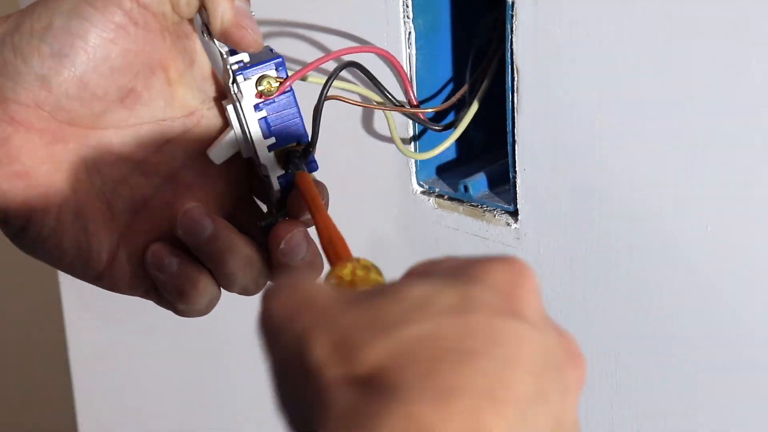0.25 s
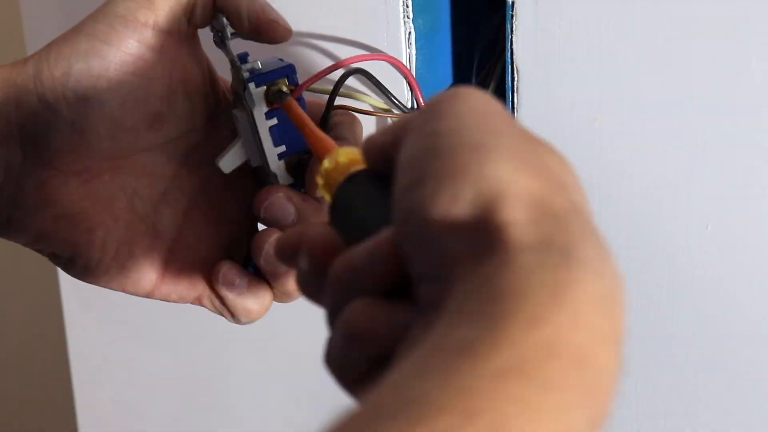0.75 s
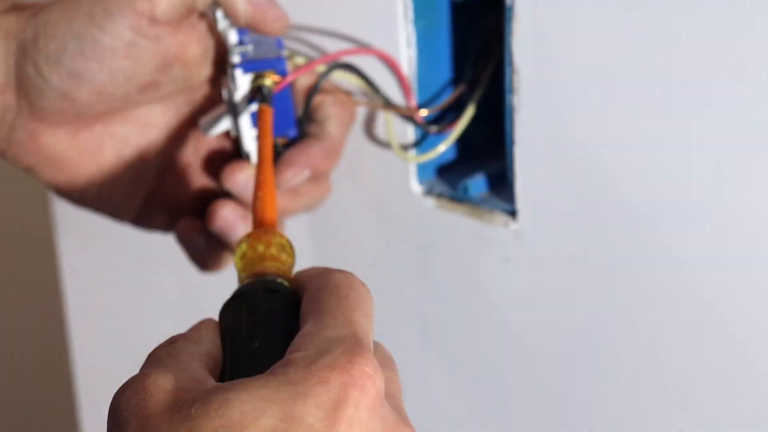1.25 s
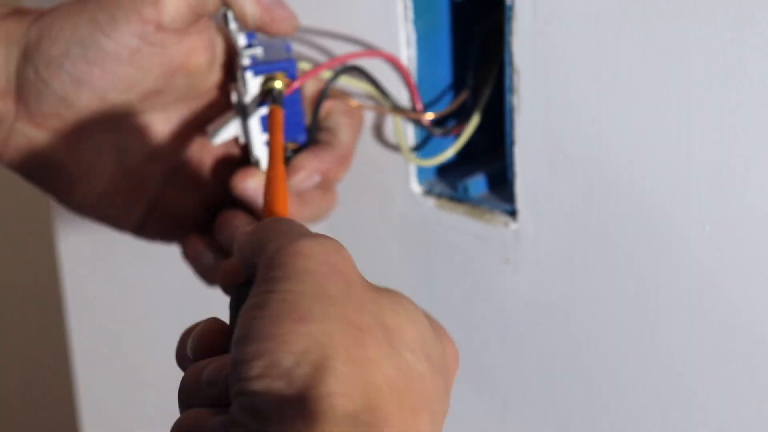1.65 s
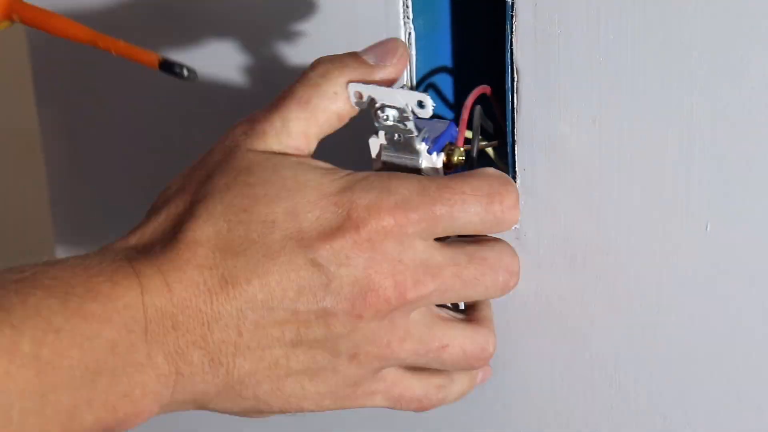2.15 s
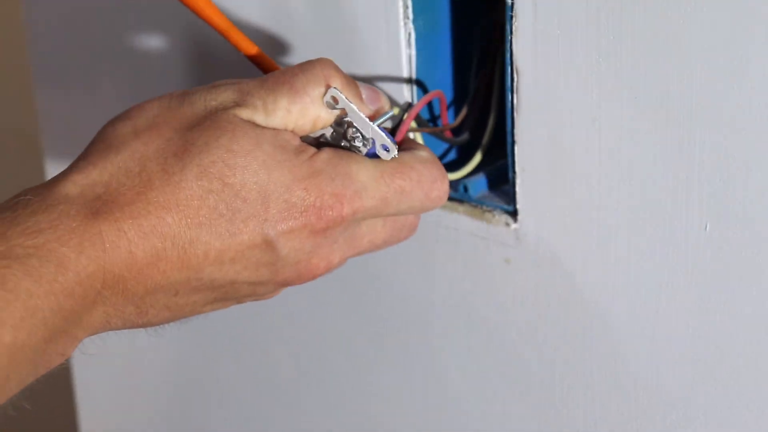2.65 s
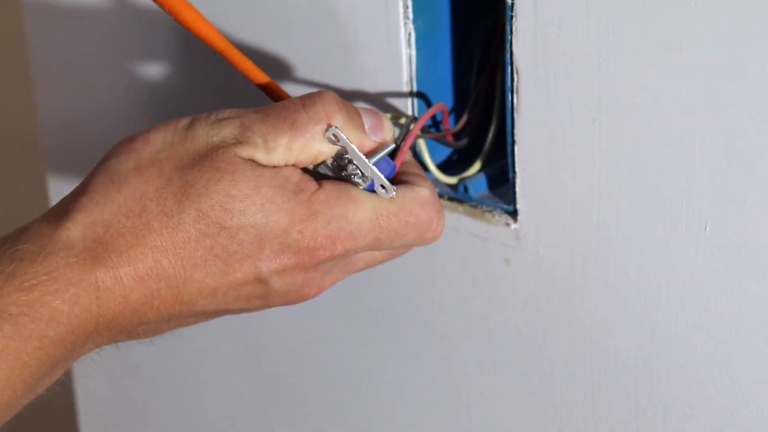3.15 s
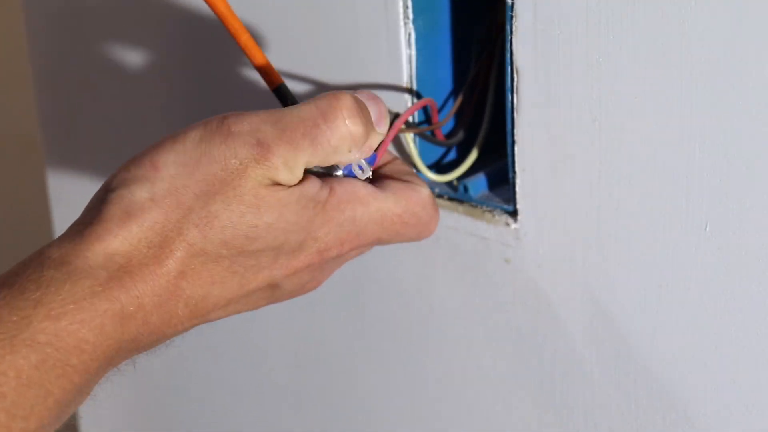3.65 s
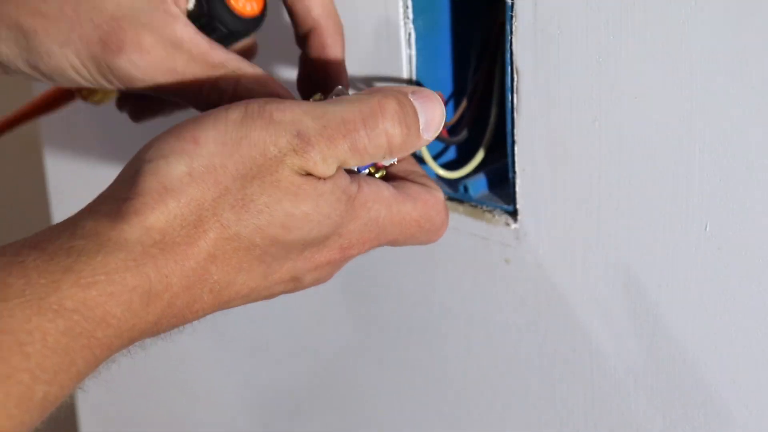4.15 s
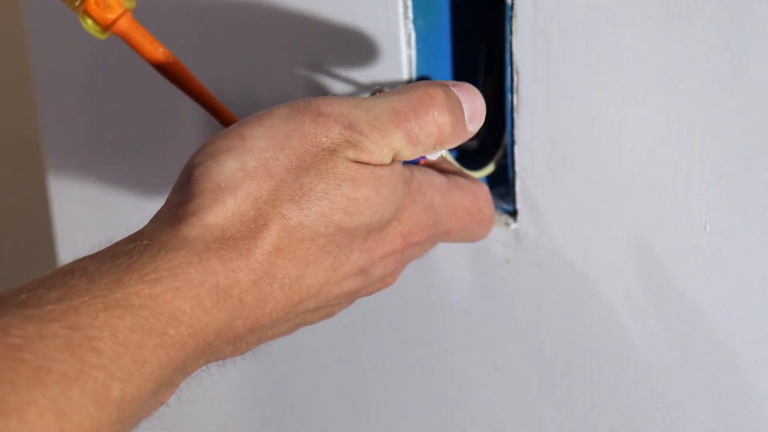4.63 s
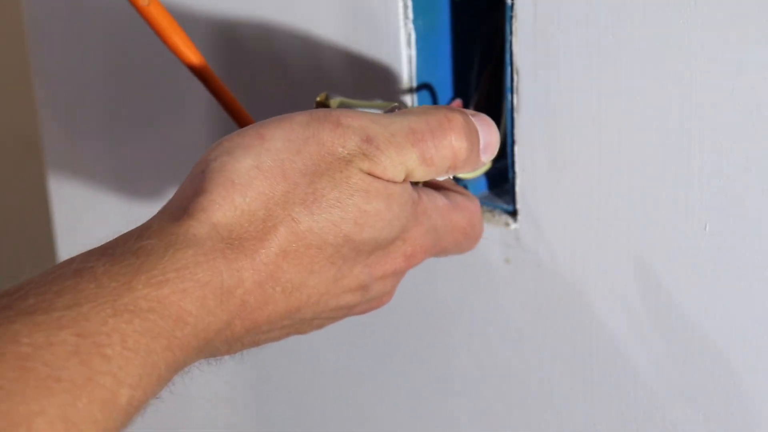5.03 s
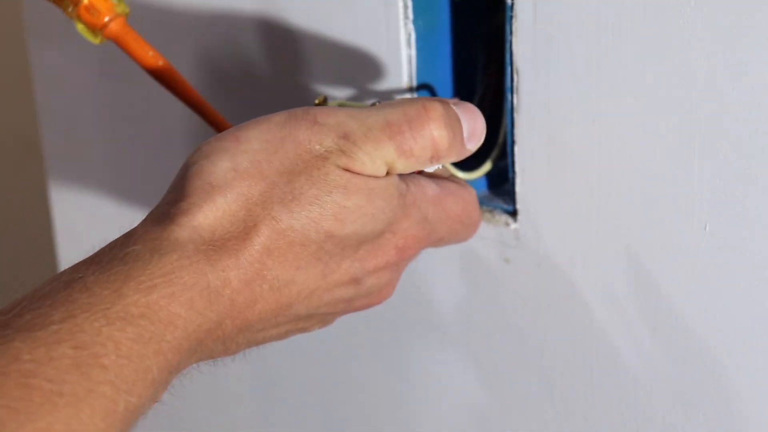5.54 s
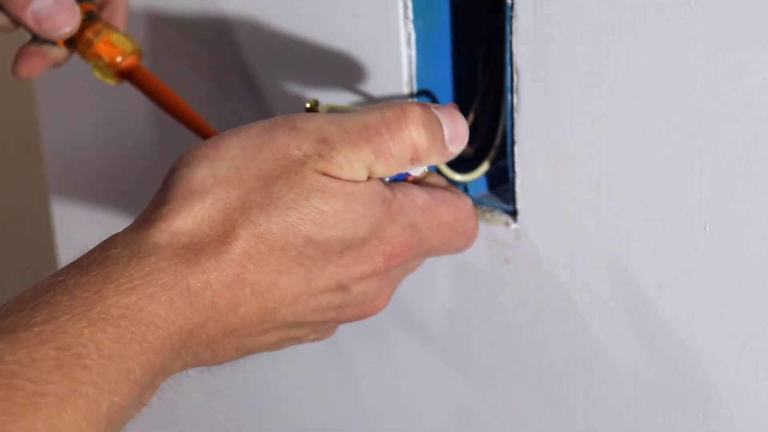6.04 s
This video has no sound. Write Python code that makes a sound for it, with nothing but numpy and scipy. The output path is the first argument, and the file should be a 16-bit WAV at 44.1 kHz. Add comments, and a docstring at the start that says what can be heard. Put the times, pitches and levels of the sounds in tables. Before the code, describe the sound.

A screwdriver turns terminal screws on a plastic switch held in the hand, very close in a quiet, small-sounding room. Dense sharp ticks, gritty scrapes and tiny squeaks come first. Just before two seconds the switch is turned over with a soft rustle and thuds, then the turning continues quieter and sparser, with regular breathy finger brushes on the handle. Steady faint hiss and a thin whine lie beneath.

```python
"""In a quiet room, close by, a screwdriver backs the terminal screws out of a wall switch held in one hand.
The tip slips, ticks and squeaks in the screw heads (struck modes, wavering tones); threads grind (filtered grains).
About three times a second the fingers brush round the handle (swelling noise); harder knocks ring a low note.
Just before two seconds the switch turns over into the fist: the resonances change, a soft rustle and thuds follow.
Short echoes, steady room hiss and a faint whine complete it; both channels are the same."""
import sys
import numpy as np
from scipy import signal
from scipy.fft import rfft, irfft
from scipy.io import wavfile
from scipy.ndimage import map_coordinates

SR = 44100
rng = np.random.default_rng(int(sys.argv[2]) if len(sys.argv) > 2 else 0)


def master(y):
    """Save y as 16-bit WAV."""
    cut = np.clip(np.atleast_2d(y).T, -1, 1)
    pcm = np.round(cut * 32767)  # scale
    wavfile.write(sys.argv[1], SR, pcm.astype(np.int16))


N = 277389
TIME = np.arange(N) / SR


def from_db(db):
    """Decibels to gain."""
    return 10 ** (np.asarray(db) / 20)


def rms_one(x):
    """Scale to unit rms."""
    return x / np.sqrt(np.mean(x ** 2) + 1e-20)


def add(track, start_s, sound):
    """Mix a sound into the track at start_s."""
    start = int(np.clip(start_s * SR, 0, N - 1))
    track[start:start + len(sound)] += sound[:N - start]


def wander(t, points_per_s, points):
    """Random curve: normal draws joined by straight lines."""
    return np.interp(t * points_per_s, np.arange(points), rng.standard_normal(points))


def colour(x, spectrum, shift=1):
    """Causal minimum-phase filter with the given response, moved in pitch by shift; rms 1."""
    size = 4096
    hz, response_db = np.transpose(spectrum)
    bin_hz = np.arange(size // 2 + 1) * SR / size
    octaves = np.log2(np.maximum(bin_hz, 1))
    knots = np.log2(hz * shift)
    # 12 dB/octave skirt below the lowest knot, at most 36 dB
    skirt_db = 12 * np.clip(knots[0] - octaves, 0, 3)
    log_gain = np.log(from_db(np.interp(octaves, knots, response_db) - skirt_db))
    # folding the cepstrum onto positive time gives minimum phase
    cepstrum = irfft(log_gain)
    cepstrum[1:size // 2] *= 2
    cepstrum[size // 2 + 1:] = 0
    impulse = irfft(np.exp(rfft(cepstrum)))
    return rms_one(signal.fftconvolve(x, impulse)[:len(x)])


def grains(per_s, spread_db, smooth_db, low_hz, high_hz, count):
    """Tiny slips of uneven size, each ringing at one of count pitches, over smooth sliding noise."""
    size_db = spread_db * np.minimum(rng.exponential(1, N), 4)
    sizes = from_db(size_db) * rng.choice([-1, 1], N)
    slip_train = sizes * (rng.random(N) < per_s / SR)
    dealt = rng.integers(0, count, N)
    white = rng.standard_normal((2, N))
    rings, smooth = 0, 0
    for k, hz in enumerate(np.geomspace(low_hz, high_hz, count)):
        ringer = signal.iirpeak(hz, 6, fs=SR)
        # the tiny offset avoids denormals
        rings = rings + signal.lfilter(*ringer, slip_train * (dealt == k) + 1e-18)
        smooth = smooth + signal.lfilter(*ringer, white[k % 2]) * (-1) ** (k // 2)
    return rms_one(rings) + from_db(smooth_db) * rms_one(smooth)


def strike(modes, length_s, scatter, uneven_db, favoured_hz=None):
    """One blow on decaying modes, each shifted in pitch and share by the contact point; rms 1 over 2 ms."""
    hz, level_db, t60_s = np.transpose(modes)[:, :, None]
    if favoured_hz:
        level_db = level_db - 36 * np.abs(np.log2(hz / favoured_hz))  # dB per octave away
    t = TIME[:int(length_s * SR)]
    detune, share = rng.standard_normal((2, len(modes), 1))
    signs = (-1) ** np.arange(len(modes))[:, None]
    decay = from_db(level_db + uneven_db * share - 60 * t / t60_s)
    tones = np.sin(2 * np.pi * hz * (1 + scatter * detune) * t)
    ring = (signs * decay * tones).sum(axis=0)
    return ring / np.sqrt(np.mean(ring[:SR // 500] ** 2))


def echoes(length_s, t60_s, delay_s, dull_hz):
    """Diffuse echoes: delayed, decaying noise through a gentle low-pass."""
    t = TIME[:int(length_s * SR)]
    tail = rng.standard_normal(len(t)) * from_db(-60 * t / t60_s) * (t > delay_s)
    low_pass = signal.butter(1, dull_hz, fs=SR, output="sos")
    return signal.sosfilt(low_pass, tail / np.linalg.norm(tail))


# turn-over into the fist: start_s, end_s
TURN_OVER = (1.87, 1.89)


def grip(s, open_and_fist):
    """A value that changes as the switch is turned over from the open hand into the fist."""
    return np.interp(s, TURN_OVER, open_and_fist)


# steady room background: freq_hz, spectrum_db
ROOM_AIR = [(30, -43), (80, -41), (300, -15), (550, 1), (1500, 3), (2700, -2.5), (5200, -17.5), (6400, -8),
            (10500, -26), (16000, -21)]
AIR_DB = -52


def room_air():
    """Steady room hiss: coloured white noise."""
    return from_db(AIR_DB) * colour(rng.standard_normal(N), ROOM_AIR)


WHINE_HZ, WHINE_DB = 3370, -61.5
WHINE_WAVER_HZ, WHINE_WAVERS_PER_S = 14, 40


def whine():
    """A thin background tone: a sine with slightly wandering frequency."""
    pitch_hz = WHINE_HZ + WHINE_WAVER_HZ * wander(TIME, WHINE_WAVERS_PER_S, N // 100)
    return from_db(WHINE_DB) * rms_one(np.sin(2 * np.pi * np.cumsum(pitch_hz) / SR))


# tip resting in the slot between strokes: time_s, grind_db
RESTING_GRIND = [(0, -45), (.55, -39.5), (.7, -46), (.85, -39.5), (1.05, -44.5), (1.4, -38.5), (1.62, -50),
                 (1.87, -50), (1.92, -54), (2.25, -49), (2.65, -46.5), (3.2, -49.5), (4.15, -52),
                 (4.55, -48.5), (5, -51.5), (6.29, -52)]
RESTING_BRIGHT_DB = -2.5
# scrapes as the screw twists or the switch shifts under the tool: start_s, end_s, grind_db, bright_db
TWIST_STROKES = [(0, 0.026, -35, -13), (0.071, 0.191, -34, 4.5), (.225, .29, -40.5, 8),
                 (0.344, 0.4, -37.5, 8), (0.583, 0.628, -33.5, 7), (0.753, .815, -35, 9),
                 (1.083, 1.16, -41.5, 3), (1.517, 1.56, -39.5, 9), (1.734, 1.772, -32.5, 9.5),
                 (1.798, 1.861, -38, 4), (1.866, 1.889, -30, 1.5), (2.047, 2.099, -38.5, 6.5),
                 (2.174, 2.199, -33, -18), (2.202, 2.244, -40, -12), (2.534, 2.585, -40.5, 9),
                 (2.92, 2.998, -43.5, -4), (3.098, 3.172, -44, 5), (3.228, 3.272, -42, -1),
                 (3.458, 3.515, -44, 6), (3.582, 3.63, -44, 10), (3.83, 3.946, -43, 9),
                 (4.185, 4.3, -45.5, -5), (4.465, 4.505, -44.5, 5), (4.602, 4.72, -52, -8),
                 (4.852, 4.948, -41, -10.5), (5.203, 5.24, -41.5, 4), (5.29, 5.33, -45, 5),
                 (5.52, 5.626, -43.5, -4), (5.663, 5.733, -40.5, -4), (5.954, 6.032, -46.5, 8),
                 (6.044, 6.106, -39.5, 0)]
TWIST_ATTACK_S, TWIST_RELEASE_S = 0.0069, 0.017
DRAG_SHAPE = 0.31  # power of a half sine


def grinding():
    """Friction level and brightness in dB: powers of resting contact, twists and dragging regrips add."""
    time_s, resting_db = np.transpose(RESTING_GRIND)
    strokes = [(from_db(np.interp(TIME, time_s, resting_db)), RESTING_BRIGHT_DB)]
    for start_s, end_s, grind_db, bright_db in TWIST_STROKES:
        edge = np.minimum((TIME - start_s) / TWIST_ATTACK_S, (end_s - TIME) / TWIST_RELEASE_S)
        strokes.append((from_db(grind_db) * np.clip(edge + .5, 0, 1), bright_db))
    for start_s, end_s, _, _, grind_db, bright_db in HANDLE_SLIDES:
        along = np.clip((TIME - start_s) / (end_s - start_s), 0, 1)
        swell = np.abs(np.sin(np.pi * along)) ** DRAG_SHAPE
        strokes.append((from_db(grind_db) * swell, bright_db))
    power = sum(gain ** 2 for gain, _ in strokes)
    mean_bright_db = sum(gain ** 2 * bright_db for gain, bright_db in strokes) / power
    return 10 * np.log10(power), mean_bright_db


# friction colours, plastic rub / thread grit / fine hiss: freq_hz, response_db
RUB_COLOUR = [(300, -21.5), (600, -5), (1150, -6.5), (1500, 0), (1850, 1), (2200, -3), (2800, -5),
              (3600, -15), (6000, -54)]
GRIT_COLOUR = [(2500, -20.5), (3100, 1.5), (3550, 0.5), (4900, 2), (5600, 1), (6400, -10), (8200, -3.5),
               (9200, -9), (10800, -19.5), (16000, -48)]
HISS_COLOUR = [(6000, -12), (9000, -7.5), (10800, -5.5), (12700, -2.5), (16000, -10.5)]
# share of the grinding: open_hand_db, fist_db
RUB_DB, GRIT_DB, HISS_DB = (-7.5, -3.5), (-5, -5.5), (-23.5, -15)
RUB_LOSS = 0.24  # dB lost per dB of brightness
CATCHES_PER_S, CLUMP_DB = 140, 2.2


def friction(grind_db, bright_db):
    """Dense micro-slips: dull on the plastic, gritty in the threads, with a fine hiss on top."""
    rub_db = grind_db + grip(TIME, RUB_DB) - RUB_LOSS * bright_db
    grit_db = grind_db + grip(TIME, GRIT_DB)
    hiss_db = grind_db + grip(TIME, HISS_DB) + bright_db
    # threads catch and let go: grit and hiss clump together
    clumps = from_db(CLUMP_DB * wander(TIME, CATCHES_PER_S, N // 100))
    plastic = grains(2500, 3.47, -4, low_hz=455, high_hz=3200, count=14)
    threads = grains(2200, 3.8, -5, low_hz=2900, high_hz=10000, count=12)
    dust = grains(1500, 7, 1, low_hz=7000, high_hz=15500, count=8)
    rub = from_db(rub_db) * colour(plastic, RUB_COLOUR)
    grit = from_db(grit_db) * colour(threads * clumps, GRIT_COLOUR)
    hiss = from_db(hiss_db) * colour(dust * clumps, HISS_COLOUR)
    return rub + grit + hiss


# narrow resonances on every contact: freq_hz, width_hz, open_hand_boost_db, fist_boost_db
BODY_RESONANCES = [(569, 8, 11.5, 6), (943.4, 46, 9, 4.5), (1533, 150, 5, -0.5), (1850, 122, 5, 4),
                   (2660, 560, -2.5, -2.5), (3780, 120, 3.5, 8), (4200, 29, 6.5, 3), (4800, 53, 7, 4),
                   (7860, 70, 4.5, -5), (8080, 62, 2.5, 4.5), (9560, 750, -8, 3), (11270, 420, 6, -6)]
LOW_CUT_HZ = 604


def held_body(x):
    """Switch and tool resonate with contacts; closing the fist damps some resonances and frees others."""
    for hz, width_hz, open_db, fist_db in BODY_RESONANCES:
        ringing = signal.lfilter(*signal.iirpeak(hz, hz / width_hz, fs=SR), x)
        x = x + (from_db(grip(TIME, (open_db, fist_db))) - 1) * ringing
    # parts this small radiate almost no bass
    return signal.sosfilt(signal.butter(2, LOW_CUT_HZ, "high", fs=SR, output="sos"), x)


# clear slips of the tip: start_s, tip_db, case_db, favoured_pitch_hz
TIP_SLIPS = [(0.0284, -27.5, -29.5, 4000), (.062, -28, -40, 3800), (0.094, -25, -32, 3900),
             (.118, -26, -33, 3780), (0.1464, -23.5, -38, 4500), (0.1752, -31.5, -31, 3830),
             (.1895, -29.5, -48, 3820), (0.2299, -27, -56, 4420), (.257, -31.5, -35.5, 3820),
             (.466, -25.5, -30, 3690), (.538, -30, -44, 3870), (0.6169, -49, -27, 4070),
             (0.6428, -29.5, -38, 3780), (.691, -39.5, -38, 4500), (0.784, -26, -37.5, 3820),
             (0.7941, -24, -34.5, 4520), (0.8062, -34, -48, 4050), (0.8344, -39, -28.5, 3830),
             (0.8407, -29, -54, 4130), (0.8639, -25.5, -36, 4050), (0.9128, -25.5, -38, 4470),
             (0.9694, -26.5, -44, 4540), (1.02, -26, -38, 3830), (1.0414, -26.5, -58, 3740),
             (1.054, -30.5, -48, 4480), (1.095, -32.5, -45, 3900), (1.125, -26.5, -34.5, 4520),
             (1.1752, -28.5, -34, 4460), (1.2282, -31.5, -27, 4400), (1.2535, -30, -37, 4400),
             (1.385, -29, -31.5, 4070), (1.4525, -27, -31, 4530), (1.466, -25.5, -38, 4020),
             (1.551, -30.5, -40, 4560), (1.585, -27.5, -48, 4660), (1.5938, -28, -37.5, 3840),
             (1.755, -30.5, -36, 4370), (1.7895, -25.5, -55, 4470), (1.816, -27, -35, 3950),
             (1.9517, -39.5, -42, 4300), (1.977, -34.5, -48, 4200), (2.0081, -39.5, -52, 3400),
             (2.1788, -32.5, -22.5, 3640), (2.3426, -32.5, -31.5, 4660), (2.5629, -30, -53, 5100),
             (2.5882, -34, -54, 5070), (2.8847, -41, -52, 4030), (3.0152, -33, -62, 4470),
             (3.0657, -38, -33.5, 4000), (3.134, -35, -55, 3650), (3.1571, -29.5, -57, 4030),
             (3.172, -45, -57, 3840), (3.2115, -36, -58, 3820), (3.306, -39.5, -41, 3820),
             (3.415, -30, -35, 4530), (3.498, -31, -58, 3840), (3.5974, -30.5, -49, 4540),
             (3.6792, -35.5, -39, 3840), (3.8076, -28, -43, 3980), (3.8625, -33, -59, 3830),
             (3.883, -32, -60, 4030), (3.9359, -38.5, -54, 3820), (4.195, -38.5, -39, 4100),
             (4.2211, -34.5, -48, 3700), (4.4947, -44.5, -50, 4170), (4.7028, -45, -29, 3830),
             (4.942, -36.5, -42, 5040), (4.952, -39, -37, 3830), (5.0163, -40.5, -32, 3830),
             (5.2303, -41.5, -36, 3820), (5.338, -38.5, -31, 3600), (5.379, -43.5, -32.5, 4170),
             (5.519, -38.5, -29.5, 3830), (5.6494, -36.5, -33.5, 3820), (5.6747, -42, -44, 3830),
             (5.6894, -38, -35, 3900), (5.771, -29.5, -39, 3830), (6.05, -31, -32.5, 3680),
             (6.0799, -33.5, -35, 3740), (6.2341, -36.5, -28.5, 4300)]
# one chatter after each clear slip
REBOUND_S, REBOUND_LOSS_DB = 0.005, 11.5
# faint ticks; TICK_DB is over the grinding, TICK_CASE_DB is case against tip
TICKS_PER_S, TICK_DB, TICK_SPREAD_DB, TICK_CASE_DB, TICK_HZ = 34, 0.5, 4, -11.5, 4040


def slips(grind_db):
    """Clear slips, a rebound after each, and chance ticks that follow the grinding level."""
    rebounds = []
    for (start_s, tip_db, case_db, hz), late in zip(TIP_SLIPS, rng.random(len(TIP_SLIPS))):
        rebound_s = start_s + REBOUND_S * (.5 + late)
        rebounds.append((rebound_s, tip_db - REBOUND_LOSS_DB, case_db - REBOUND_LOSS_DB, hz))
    step = SR // 200
    chance = rng.random(N // step)
    luck = np.clip(rng.standard_normal((N // step, 3)), -2, 1)
    ticks = []
    for k in np.flatnonzero(chance < TICKS_PER_S * step / SR):
        level_db = grind_db[k * step] + TICK_DB
        tip_db, case_db = level_db + TICK_SPREAD_DB * luck[k, :2]
        pitch_hz = TICK_HZ * np.exp(0.1 * luck[k, 2])
        ticks.append((k * step / SR, tip_db, case_db + TICK_CASE_DB, pitch_hz))
    return list(TIP_SLIPS) + rebounds + ticks


# modes of plastic case, steel tip, screw head, finest head modes: freq_hz, level_db, t60_s
CASE_MODES = [(720, -21, 0.0034), (935, -6, 0.0051), (1501, -1.5, 0.023), (1770, 5, 0.006),
              (2570, -10, 0.021)]
TIP_MODES = [(3500, 0, .004), (3820, 0, .0036), (4230, 0, .0026), (4780, 0, .0026), (5500, -2, .002)]
HEAD_MODES = [(6870, 0.5, 0.0014), (7940, -4, 0.0066), (8035, -2.5, 0.0056), (9350, -8, 0.0061)]
FINE_MODES = [(11600, -2, 0.0083), (12900, -3, 0.021), (14600, -30, 0.0016)]
# open_hand_db, fist_db
HEAD_OVER_TIP_DB, FINE_OVER_HEAD_DB = (-5, -0.5), (-26.5, -11.5)
CASE_TRIM_DB = -2.5
NEAR_T60_S, NEAR_DB = .035, -10.5


def clicks(grind_db):
    """Each slip rings case, tip and screw head; the moving hands scatter its echoes differently each time."""
    out = np.zeros(N)
    ring_s = .04
    for start_s, tip_db, case_db, tip_hz in slips(grind_db):
        head_db = tip_db + grip(start_s, HEAD_OVER_TIP_DB)
        fine_db = head_db + grip(start_s, FINE_OVER_HEAD_DB)
        tick = from_db(case_db + CASE_TRIM_DB) * strike(CASE_MODES, ring_s, scatter=0.056, uneven_db=1)
        tick += from_db(tip_db) * strike(TIP_MODES, ring_s, scatter=0.035, uneven_db=0.5, favoured_hz=tip_hz)
        tick += from_db(head_db) * strike(HEAD_MODES, ring_s, scatter=0.042, uneven_db=0.5)
        tick += from_db(fine_db) * strike(FINE_MODES, ring_s, scatter=0.037, uneven_db=14)
        near = from_db(NEAR_DB) * echoes(ring_s, NEAR_T60_S, delay_s=0.0023, dull_hz=12900)
        add(out, start_s, tick)
        add(out, start_s, signal.fftconvolve(tick, near))
    return out


def swelling_blows(events, modes, length_s, scatter, attack_s):
    """Modal blows whose onset is softened by an exponential swell."""
    out = np.zeros(N)
    for start_s, level_db in events:
        note = strike(modes, length_s, scatter, uneven_db=1.5)
        swell = 1 - np.exp(-TIME[:len(note)] / attack_s)
        add(out, start_s, from_db(level_db) * note * swell)
    return out


# knocks on the whole switch: start_s, level_db (before the swell)
SWITCH_KNOCKS = [(.095, -48), (.175, -46.5), (1.325, -47), (1.818, -43.5), (2.085, -47.5), (2.18, -39),
                 (3.09, -40.5), (3.413, -40.5), (3.497, -48), (3.883, -47.5), (6.264, -51)]
# slow low modes: freq_hz, level_db, t60_s
LOW_NOTE_MODES = [(566, 1, 0.15), (413, -18, 0.11), (905, -2.5, 0.051)]


def knocks():
    """Firm shoves wake the slow low modes, which swell over a few milliseconds."""
    return swelling_blows(SWITCH_KNOCKS, LOW_NOTE_MODES, length_s=.25, scatter=.003, attack_s=0.0019)


# tip skidding in the slot: start_s, length_s, level_db, pitch_hz
TIP_SQUEAKS = [(.112, 0.0079, -34, 3720), (0.378, 0.027, -38, 1619), (0.458, 0.015, -35, 2360),
               (1.549, 0.01, -34.5, 2380), (3.092, .02, -40, 3580), (3.149, .012, -45, 3850),
               (6.05, 0.02, -40.5, 3800)]


def squeaks(waver_hz=330, wavers_per_s=900):
    """Stick and slip lock on to one unsteady pitch for up to a few hundredths of a second."""
    out = np.zeros(N)
    for start_s, length_s, level_db, hz in TIP_SQUEAKS:
        t = TIME[:int(length_s * SR)]
        pitch_hz = hz + waver_hz * wander(t, wavers_per_s, 100)
        tone = np.sin(2 * np.pi * np.cumsum(pitch_hz) / SR)
        add(out, start_s, from_db(level_db) * rms_one(tone * np.sin(np.pi * t / length_s)))
    return out


# fingers on the handle, tip dragged along: start_s, end_s, skin_db, centre_hz, drag_grind_db, drag_bright_db
HANDLE_SLIDES = [(.453, 0.557, -41.5, 5170, -45, 0), (0.884, 0.972, -41.5, 5260, -40.5, 7),
                 (1.27, 1.382, -57, 5270, -38.5, -12), (1.635, 1.736, -41.5, 5170, -36, 7),
                 (2.015, 2.283, -43.5, 5600, -48, 8), (2.359, 2.522, -42, 5940, -43.5, 0),
                 (2.713, 2.834, -39, 5200, -42, -4), (3.044, 3.113, -47, 5500, -44, -4),
                 (3.368, 3.437, -39.5, 5100, -37.5, -1), (3.669, 3.819, -40.5, 5140, -43, 8),
                 (4.015, 4.11, -40.5, 5250, -44.5, -1), (4.328, 4.459, -36.5, 5170, -41, -3),
                 (4.731, 4.833, -38.5, 5100, -41, -5), (5.053, 5.175, -42.5, 5200, -43, -8),
                 (5.394, 5.491, -39.5, 5330, -41, -13), (5.781, 5.872, -39.5, 5150, -39.5, 5.5),
                 (6.137, 6.287, -43.5, 5200, -38, 3.5)]
# skin noise colour, before its pitch shift: freq_hz, response_db
SKIN_COLOUR = [(2500, -4), (4400, -29), (5000, 4), (5500, 7), (6700, -6), (8000, -26), (10500, -40),
               (14300, -13), (16000, -14)]
SKIN_TRIM_DB = -1.8


def finger_slides(glide=.09, lumpy_db=2.0):
    """Skin brushes round the handle in short, uneven swells that rise a little in pitch."""
    out = np.zeros(N)
    for start_s, end_s, skin_db, centre_hz, _, _ in HANDLE_SLIDES:
        along = np.linspace(0, 1, max(int((end_s - start_s) * SR), SR // 100))
        lumps = wander(along, 9, 10)
        swell = np.abs(np.sin(np.pi * along)) ** 0.51 * from_db(lumpy_db * lumps)
        brush = colour(rng.standard_normal(SR // 2), SKIN_COLOUR, shift=centre_hz / 5300)
        # reading ever faster raises the pitch
        read_at = np.cumsum(1 + glide * (along - .5))
        brush = map_coordinates(brush, [read_at], order=3)
        add(out, start_s, from_db(skin_db + SKIN_TRIM_DB) * swell * brush)
    return out


def palm(level_db=-70, lead_s=.15, lag_s=0.5):
    """The switch rolls over in the palm with a soft, lumpy rustle of low grains."""
    start_s, end_s = TURN_OVER
    swell = np.interp(TIME, [start_s - lead_s, start_s, end_s, end_s + lag_s], [0, 1, 1, 0])
    rustle = rms_one(grains(250, 3, 6, low_hz=170, high_hz=450, count=6))
    return from_db(level_db) * swell * rustle


# switch dropping into the fist: start_s, level_db (before the swell)
FIST_THUDS = [(2.077, -30.5), (2.181, -38)]
# gripped switch: freq_hz, level_db, t60_s
GRIPPED_MODES = [(383, -9.5, 0.061), (830, -1, .04), (1176, 9, 0.041)]


def thuds():
    """Cushioned by the fingers, the switch rings low and briefly."""
    return swelling_blows(FIST_THUDS, GRIPPED_MODES, length_s=.12, scatter=.02, attack_s=0.0031)


ROOM_T60_S, ROOM_DB = .15, -15


def scene():
    """The work at the switch, a little room, steady hiss and a faint whine; the same in both ears."""
    grind_db, bright_db = grinding()
    contacts = friction(grind_db, bright_db) + clicks(grind_db) + squeaks() + finger_slides()
    work = held_body(contacts) + knocks() + palm() + thuds()
    walls = echoes(.5, ROOM_T60_S, delay_s=0.0032, dull_hz=6600)
    room = from_db(ROOM_DB) * signal.fftconvolve(work, walls)[:N]
    return np.tile(work + room + room_air() + whine(), (2, 1))


CUTOFF_HZ = 15750


def record(dry):
    """Steep elliptic low-pass cuts the top."""
    low_pass = signal.ellip(10, .1, 70, CUTOFF_HZ, fs=SR, output="sos")
    return signal.sosfilt(low_pass, dry)


dry = scene()
out = record(dry)
master(out)
```